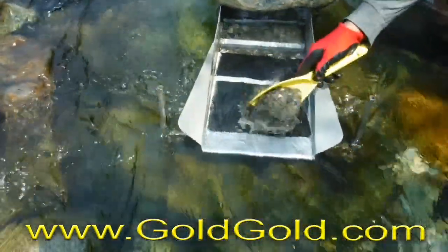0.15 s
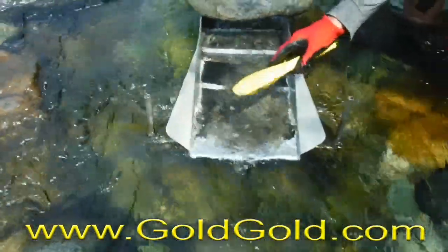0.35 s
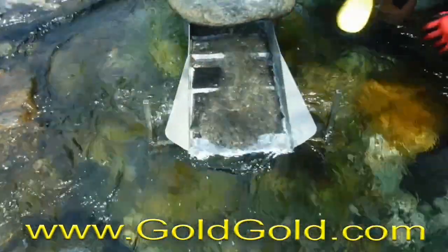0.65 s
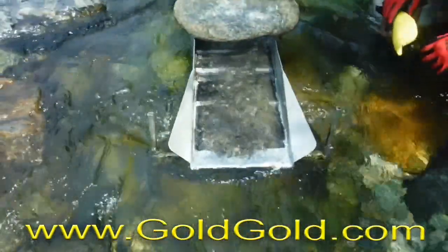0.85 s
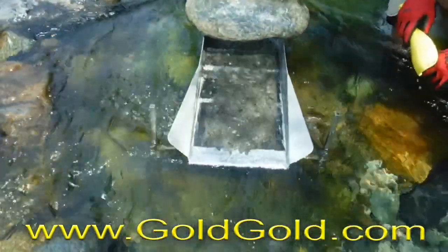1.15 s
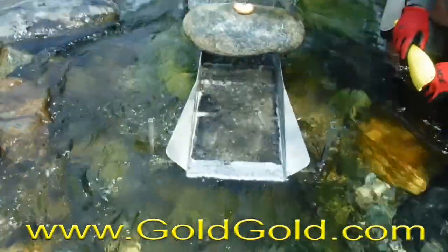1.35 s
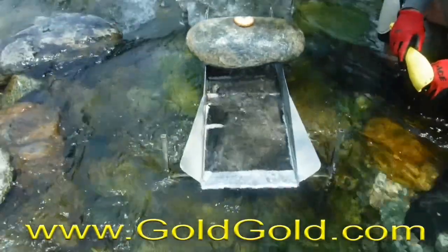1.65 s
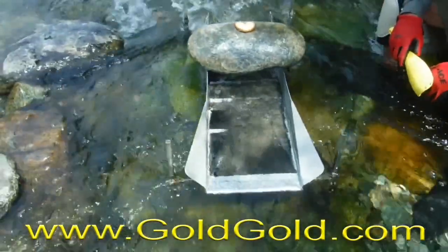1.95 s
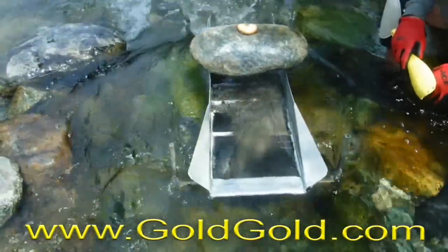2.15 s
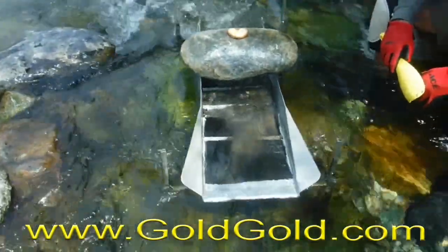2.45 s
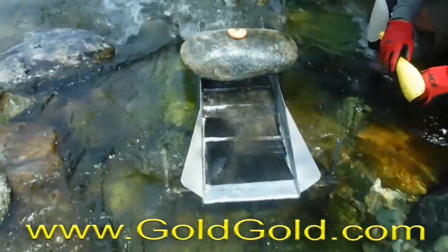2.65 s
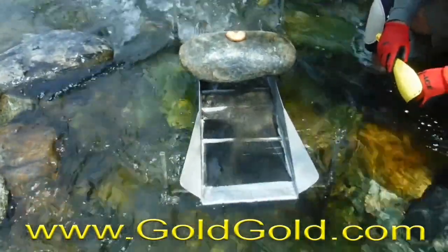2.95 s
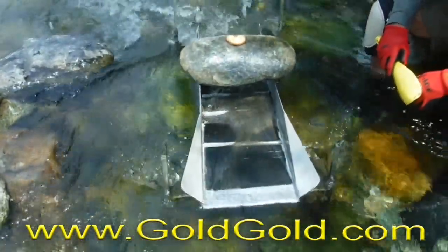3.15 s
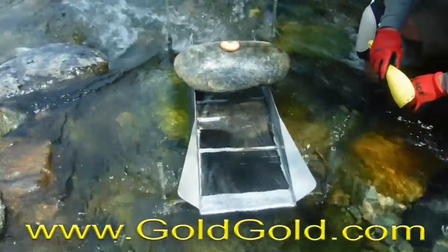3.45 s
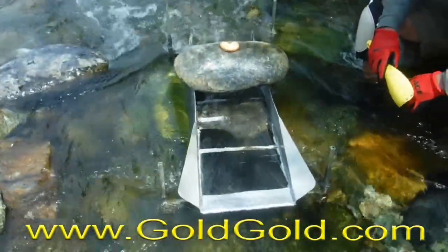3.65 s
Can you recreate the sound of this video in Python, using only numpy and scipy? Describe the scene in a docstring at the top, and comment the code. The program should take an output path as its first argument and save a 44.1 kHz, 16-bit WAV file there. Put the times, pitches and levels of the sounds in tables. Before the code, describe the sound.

A shallow stream rushes continuously with high blips and spray ticks. Two sharp hollow knocks and pebble clicks come early, a louder pair late, overloading the small nearby microphone in the open air.

```python
"""A shallow creek with a metal trough: water rushes over rocks as a wash of noise, with thousands of small
bubbles (short gliding tones) and spray ticks (puffs of noise). Gravel gurgles low and slides into the water.
Close by, a hollow scoop is knocked a few times: cracks, contact tones and ringing body modes, with
pebble taps and low thumps. The loudest knocks overload the small microphone."""
import sys
import numpy as np
from scipy import signal
from scipy.fft import rfft, irfft
from scipy.io import wavfile
from scipy.ndimage import uniform_filter1d

SR = 44100
rng = np.random.default_rng(int(sys.argv[2]) if len(sys.argv) > 2 else 0)


def elevation(decibels):
    """Turn decibel levels (scalar or array-like) into linear amplitude ratios."""
    levels = np.asarray(decibels, float)
    return 10 ** (levels / 20)


def generate_wav(signal):
    """Clip the signal to [-1, 1] and save it as 16-bit WAV at the path in sys.argv[1]."""
    frames = np.transpose(np.atleast_2d(signal))
    scaled = np.clip(frames, -1, 1) * 32767
    pcm = np.round(scaled).astype(np.int16)
    wavfile.write(sys.argv[1], SR, pcm)


N = 167580  # length of the scene in samples, 3.8 s
FRAMES = N // 128 + 6  # short-time spectra, one every 128 samples
BINS = 257  # frequencies in each spectrum


def evened(x):
    """Scales a sound to an rms (average strength) of 1."""
    return x / np.sqrt(np.mean(x ** 2) + 1e-20)


def curve(points, t):
    """Reads a table of times and values, with straight lines between its points."""
    return np.interp(t, *np.transpose(points))


# Colour of the water through the microphone, relative power per Hz: [f/Hz, level/dB]
WATER_COLOUR = [(15, -45), (30, -28), (50, -13), (85, -27), (130, -24.5), (185, -6.5), (270, -4),
                (400, -7.5), (600, -3.5), (960, -2.5), (1600, -4.5), (2200, -2), (3000, -5), (3700, -1.5),
                (4600, -0.5), (5600, -5), (7000, -10.5), (8300, -17.5), (9400, -20.5), (10500, -21.5),
                (12500, -29), (14500, -38), (16000, -46)]


def colour_db(hz):
    """Reads the water's spectrum on a log-frequency axis, closer to how we hear pitch."""
    f, db = np.transpose(WATER_COLOUR)
    return np.interp(np.log(hz + 1), np.log(f + 1), db)


def coloured(x, tilt_db=0):
    """Filters a white sound to the water's colour; tilt_db per octave makes it brighter."""
    hz = np.fft.rfftfreq(len(x), 1 / SR)
    gain_db = colour_db(hz) + tilt_db * np.log2(hz / 4000 + 0.01)
    return evened(irfft(rfft(x) * elevation(gain_db), len(x)))


def add(mix, s, sound):
    """Mixes a sound in at time s, in seconds."""
    part = mix[round(s * SR):][:len(sound)]
    part += sound[:len(part)]


def bubble(hz, cycles, glide, rise=0.083):
    """A tone that swells quickly, dies over some cycles and slides up (down if glide < 0); peak near 1."""
    u = np.arange(0, 3, hz / cycles / SR)  # time in units of that many cycles
    shape = (1 - np.exp(-u / rise)) * np.exp(-2 * u)
    phase = 2 * np.pi * cycles * (u + glide * u ** 2 / 2)
    return shape / shape.max() * np.sin(phase)


def sparse(per_s, spread_db):
    """Clicks at random moments, a few much larger than the rest."""
    size = elevation(spread_db * np.minimum(rng.exponential(1, N), 3))
    return size * (rng.random(N) < per_s / SR)


def noise(magnitude_db):
    """Noise from random short-time spectra, shaped by a dB field of bins x frames."""
    real, imag = rng.standard_normal((FRAMES, BINS, 2)).T
    spectra = (real + 1j * imag) * elevation(magnitude_db)
    return evened(signal.istft(spectra, nperseg=512, noverlap=384)[1][:N])


def smooth_field(x, bins, frames):
    """Smooths a random field over frequency and time, leaving patches of about that size."""
    return evened(uniform_filter1d(uniform_filter1d(x, size=bins, axis=0), size=frames, axis=1))


WASH_DB, PATCH_DB, FLICKER_DB = -3, 1.5, 0.68


def wash():
    """Countless far bubbles blur into noise, with drifting patches and a flicker over wide bands."""
    patch, wide = rng.standard_normal((FRAMES, BINS, 2)).T
    patch = smooth_field(patch, bins=6, frames=14)
    wide = smooth_field(wide, bins=120, frames=8)
    return elevation(WASH_DB) * coloured(noise(PATCH_DB * patch + FLICKER_DB * wide))


FIZZ_DB, FIZZ_PER_S, FIZZ_SPREAD_DB = -6, 1800, 3.5
FIZZ_CYCLES, FIZZ_GLIDE = 7.96, 0.12  # smallest values; each pitch draws its own, up to 1.83 times these


def fizz():
    """Near bubbles of all sizes, each a short rising tone; small, high ones are commoner."""
    pitches, out = np.geomspace(250, 11000, num=40), np.zeros(N)
    stretches = rng.uniform(1.0, 1.83, (40, 2))
    for hz, (longer, steeper) in zip(pitches, stretches):
        grain = bubble(hz, FIZZ_CYCLES * longer, FIZZ_GLIDE * steeper)
        clicks = sparse(FIZZ_PER_S * hz / pitches.sum(), FIZZ_SPREAD_DB)
        out += np.sqrt(hz) * evened(signal.oaconvolve(clicks, grain)[:N])
    return elevation(FIZZ_DB) * coloured(out)


SPRAY_DB, SPRAY_DECAY_S, SPRAY_TILT_DB = -9.5, 0.0012, 2.2  # tilt per octave
SPRAY_PER_S, SPRAY_SPREAD_DB = 140, 3.0


def spray():
    """Drops landing: brief wide-band puffs of noise, brighter than the wash."""
    t = np.arange(600) / SR
    clicks = sparse(SPRAY_PER_S, SPRAY_SPREAD_DB)
    puffs = signal.oaconvolve(clicks, np.exp(-t / SPRAY_DECAY_S))[:N]
    return elevation(SPRAY_DB) * coloured(puffs * rng.standard_normal(N), SPRAY_TILT_DB)


GURGLE_HZ, GURGLE_WIDTH_HZ, GURGLE_DB = 518, 290, -4.5  # width between the -6 dB points

# Gravel stirring in the trough, before GURGLE_DB is added: [t/s, level/dB]
GURGLE_LEVEL = [(0.0, -34), (0.32, -31.5), (0.51, -31.5), (2.68, -41), (3.11, -38.5), (3.8, -37)]


def gurgle():
    """Gravel stirring in the trough: lumpy low noise in one broad resonance."""
    hz = np.fft.rfftfreq(512, 1 / SR)[:, None]
    lumps = evened(uniform_filter1d(rng.standard_normal((FRAMES, BINS)).T, size=8, axis=1))
    peak_db = -20 * np.log10(1 + (2 * (hz - GURGLE_HZ) / GURGLE_WIDTH_HZ) ** 2)
    level_db = GURGLE_DB + curve(GURGLE_LEVEL, np.arange(N) / SR)
    return elevation(level_db) * noise(peak_db + 2.5 * lumps)


SWISH_GRAINS_PER_S = 1400

# Gravel sliding off the scoop: [start t/s, length t/s, level/dB]
GRAVEL_SLIDES = [(0.192, 0.16, -31)]


def swish():
    """Gravel slides into the water: a cloud of bright grains that swells and fades."""
    t = np.arange(N) / SR
    grains = sparse(SWISH_GRAINS_PER_S, 4.4) * rng.standard_normal(N)
    swell = np.zeros(N)
    for s, length, db in GRAVEL_SLIDES:
        progress = np.clip((t - s) / length, 0, 1)
        swell += elevation(db) * np.sin(np.pi * progress ** 0.53)
    return coloured(grains, 1.2) * swell


PIP_CYCLES, PIP_DB = 9.1, -10

# Loud small bubbles, peak level before PIP_DB is added: [t/s, level/dB, f/Hz]
SMALL_BUBBLES = [(0.2212, -1.5, 4050), (0.415, -1, 4540), (0.611, -7, 4700), (0.9912, 0.5, 4430),
                 (1.0864, -4, 3900), (1.2532, -2, 4500), (1.3536, -11, 3570), (1.5836, -0.5, 4280),
                 (1.6245, -2, 4300), (1.8735, -3, 5040), (1.953, -0.5, 4760), (1.997, -17, 4080),
                 (2.097, -2, 4480), (2.1206, -4, 5100), (2.2106, -2, 4390), (2.2494, -2, 3870),
                 (2.2877, -7, 4140), (2.306, -3, 6100), (2.4738, -8, 4050), (2.615, -1.5, 4150),
                 (2.744, -2, 4000), (2.889, -6, 3880), (3.0535, -9, 4430), (3.1433, -2.5, 4400),
                 (3.2824, -5, 4760), (3.3732, -2, 4470), (3.483, -1.5, 4100), (3.5952, -4.5, 3920),
                 (3.699, 3.5, 5340), (3.7563, -5, 4020)]


def pips():
    """Single small bubbles that stand out of the rush as high, slightly rising tones."""
    out = np.zeros(N)
    for s, db, hz in SMALL_BUBBLES:
        add(out, s, elevation(db + PIP_DB) * bubble(hz, PIP_CYCLES, 0.045))
    return out


PUFF_RISE_S, PUFF_HZ, PUFF_DB = 0.00084, 5030, 2.5

# Bright splashes, and faint treble cracks of the knocks at 0.4414 and 0.5287 s;
# level before PUFF_DB is added: [t/s, level/dB, decay time constant t/s]
BRIGHT_PUFFS = [(0.292, -23, 0.006), (0.4414, -35, 0.006), (0.5287, -34, 0.0055), (0.6439, -24, 0.0049),
                (0.7512, -24, 0.0067), (0.8824, -24, 0.006), (0.995, -21.5, 0.006), (1.02, -29, 0.006),
                (1.248, -26, 0.006), (1.4, -27, 0.006), (1.65, -23, 0.006), (1.6811, -24, 0.006),
                (1.758, -32, 0.0055), (1.8736, -26, 0.006), (1.992, -28, 0.006), (2.125, -22, 0.006),
                (2.186, -33, 0.006), (2.472, -20.5, 0.006), (2.6963, -23, 0.006), (3.052, -24.5, 0.006),
                (3.132, -29.5, 0.006), (3.1802, -36, 0.006), (3.2814, -29, 0.0054), (3.452, -24, 0.006),
                (3.4785, -26, 0.0055), (3.68, -31, 0.006)]


def splashes_and_treble_cracks():
    """Splashes and two treble cracks: puffs of high-passed noise with a quick rise and a short decay."""
    puffs, t = np.zeros(N), np.arange(1500) / SR
    for s, db, decay in BRIGHT_PUFFS:
        rise = np.minimum(t / PUFF_RISE_S, 1)
        add(puffs, s, elevation(db + PUFF_DB) * np.exp(-t / decay) * rise)
    band = signal.butter(2, PUFF_HZ, "highpass", fs=SR, output="sos")
    hiss = signal.sosfilt(band, coloured(rng.standard_normal(N), 3.4))
    return puffs * evened(hiss)


def without_lows(x):
    """Knocks and taps are thin in the bass: a high-pass filter at 171 Hz."""
    return signal.sosfilt(signal.butter(2, 171, "highpass", fs=SR, output="sos"), x)


def contact(hz, cycles):
    """The short, slightly falling tone of two hard things touching."""
    return bubble(hz, cycles, -0.027, rise=0.11)


CONTACT_CYCLES, CRACK_DB, CRACK_DECAY_S = 3.24, -12.5, 0.0029
RATTLE_PER_S, RATTLE_DB, RATTLE_T60_S = 500, -6.5, 0.17  # t60: time to fall by 60 dB

# Knocks of the scoop, before the high-pass filter; the ring is relative to the contact tone:
# [t/s, contact level/dB, contact f/Hz, ring level/dB, f/Hz above which the modes weaken steeply]
SCOOP_KNOCKS = [(0.4423, 4, 1400, -10.5, 3130), (0.465, -15, 1760, -2, 3000), (0.53, -3, 2300, -10.5, 2470),
                (3.1613, 3, 1310, -7.5, 1600), (3.1819, -2.5, 1150, -2, 1540),
                (3.208, -16, 1300, -15, 1600), (3.225, -16.5, 1200, -9, 1600)]
# Ringing modes of the scoop's body, relative levels: [f/Hz, level/dB, t60 t/s]
SCOOP_MODES = [(304, -5.5, 0.078), (500, 2, 0.029), (660, -6, 0.075), (761, -4, 0.05), (843, -0.5, 0.034),
               (1150, -0.5, 0.031), (1336, -1.5, .04), (1440, -3.5, .05), (1664, -5, 0.065),
               (2330, -1, 0.048), (2740, -7, .05), (3090, 0.5, .06), (3660, -13, .04)]


def knocks():
    """Each blow: a noise crack, a contact tone and the scoop's modes, rung again by a dying rattle."""
    out, t = np.zeros(N), np.arange(10000) / SR
    crack = coloured(rng.standard_normal(N), 0.51)
    for s, db, hz, ring_db, bright_hz in SCOOP_KNOCKS:
        strengths, rings = rng.uniform(1.0, 1.16, len(SCOOP_MODES)), np.zeros(10000)
        for k, (strength, (f, mode_db, t60)) in enumerate(zip(strengths, SCOOP_MODES)):
            hits = (rng.random(10000) < RATTLE_PER_S / SR) * rng.standard_normal(10000)
            strikes = hits * elevation(RATTLE_DB - 60 * t / RATTLE_T60_S)
            strikes[0] = strength * (-1) ** k  # the blow itself, with alternating sign
            mode = elevation(mode_db - 60 * t / t60) * np.sin(2 * np.pi * f * t) / (1 + (f / bright_hz) ** 4)
            rings += signal.fftconvolve(strikes, mode)[:10000]
        add(out, s, elevation(db + ring_db) * rings / 2)
        add(out, s, elevation(db + CRACK_DB) * np.exp(-t / CRACK_DECAY_S) * crack[round(s * SR):][:10000])
        add(out, s, -elevation(db) * contact(hz, CONTACT_CYCLES))
    return without_lows(out)


# Low thumps: [t/s, peak level/dB, f/Hz]
LOW_THUMPS = [(.443, -48, 40), (3.162, -20, 57), (3.458, -22, 65.5)]


def thumps():
    """Low thumps: very short bass tones that die within about one cycle."""
    out = np.zeros(N)
    for s, db, hz in LOW_THUMPS:
        add(out, s, elevation(db) * bubble(hz, 0.46, -0.046))
    return out


# Pebbles tapping, peak level before the high-pass filter: [t/s, level/dB, f/Hz, decay/cycles]
PEBBLE_TAPS = [(.492, -11, 2500, 2.5), (0.497, -7.5, 2400, 2.5), (0.509, -19.5, 500, 1.1),
               (0.546, -13, 900, 2.5), (.567, -5.5, 2190, 1.8), (0.968, -10, 696, 0.61),
               (0.984, -16.5, 2220, 2.8), (1.127, -11, 2000, 2.5), (1.136, -11, 1990, 2.3),
               (1.143, -7, 1010, 0.84), (2.176, -7.5, 1420, 0.93), (2.983, -8, 1420, 2.1),
               (3.404, -14.5, 500, 1.6)]


def taps():
    """Pebbles tapping: a contact tone so short that it is a mere click."""
    out = np.zeros(N)
    for s, db, hz, cycles in PEBBLE_TAPS:
        add(out, s, elevation(db) * contact(hz, cycles))
    return without_lows(out)


PLOP_CYCLES, PLOP_DB = 7.6, -9

# Larger bubbles, peak level before PLOP_DB is added: [t/s, level/dB, f/Hz]
LARGE_BUBBLES = [(1, -13, 996), (1.087, -16.5, 452), (1.236, -15, 930), (1.275, -14, 1340), (1.33, -7, 917),
                 (1.76, -13.5, 1000), (1.864, -9.5, 2000), (1.974, -14, 1340), (2.029, -19.5, 287),
                 (2.111, -7, 2180), (2.669, -19, 660), (2.915, -12, 784)]


def plops():
    """Single larger bubbles: lower tones than the pips, also rising slightly."""
    out = np.zeros(N)
    for s, db, hz in LARGE_BUBBLES:
        add(out, s, elevation(db + PLOP_DB) * bubble(hz, PLOP_CYCLES, 0.035))
    return out


# Level of the water sound before 3 dB is added, with brief bursts and changes of balance between
# body and fizz; the body is relative to the fizz: [t/s, level/dB, body level/dB]
WATER_LEVELS = [(0.0, -27, 8), (0.01, -25.5, -3), (0.21, -26, 0), (0.22, -22.5, -5), (0.37, -26.5, -1.5),
                (0.45, -26.5, 2), (0.51, -27, 0.5), (2.29, -26.5, -1.5), (2.31, -21.5, -3.5),
                (2.32, -27, -1.0), (3.42, -25.5, -1.5), (3.44, -28, 0.5), (3.48, -22.5, -1.5),
                (3.49, -27.5, 2.5), (3.68, -26, -2.5), (3.69, -24.5, 1), (3.71, -27, 1), (3.8, -27.5, -0.5)]


def scene():
    """Water with brief bursts, its body (below about 2500 Hz) set apart from the fizz, plus single events."""
    s, water_db, body_db = np.transpose(WATER_LEVELS)
    t = np.arange(N) / SR
    water = wash() + fizz() + spray()
    body = signal.sosfiltfilt(signal.butter(1, 2500, fs=SR, output="sos"), water)
    balanced = water - body + body * elevation(np.interp(t, s, body_db))
    water = elevation(np.interp(t, s, water_db) + 3.0) * balanced
    events = swish() + pips() + splashes_and_treble_cracks() + knocks() + thumps() + taps() + plops()
    return (water + gurgle() + events)[None]


def low_pass(x):
    """Removes everything above the highest recorded frequency."""
    return signal.sosfilt(signal.butter(12, 16520, fs=SR, output="sos"), x)


def record(dry):
    """The small microphone's input overloads: peaks beyond 0.97 of full scale are cut flat."""
    mix = np.clip(dry, -0.97, 0.97)
    return low_pass(mix)


dry = scene()
out = record(dry)
generate_wav(out)
```